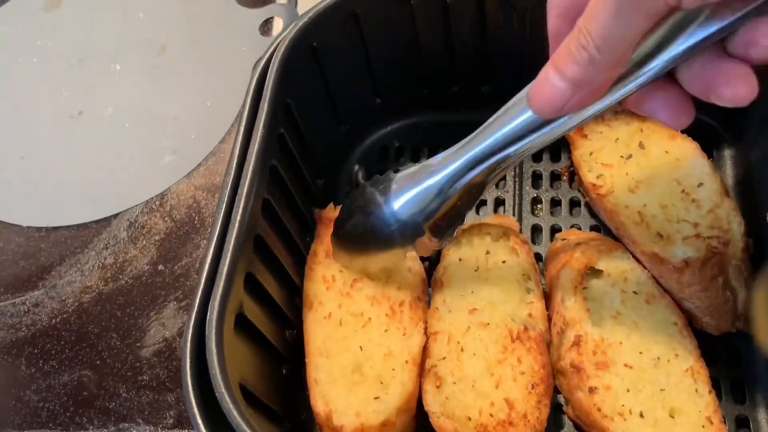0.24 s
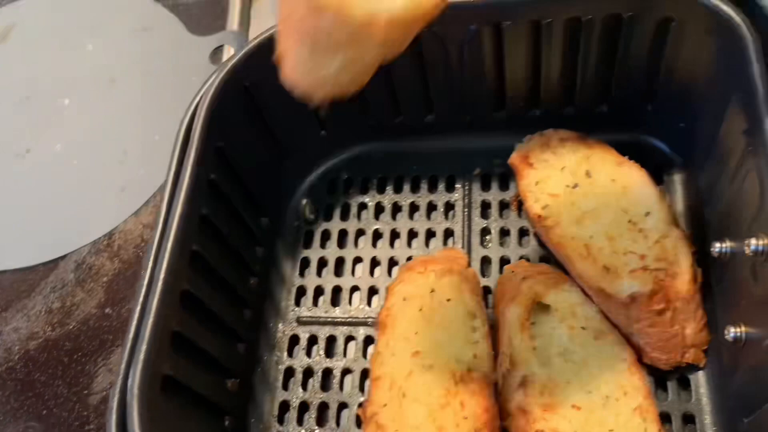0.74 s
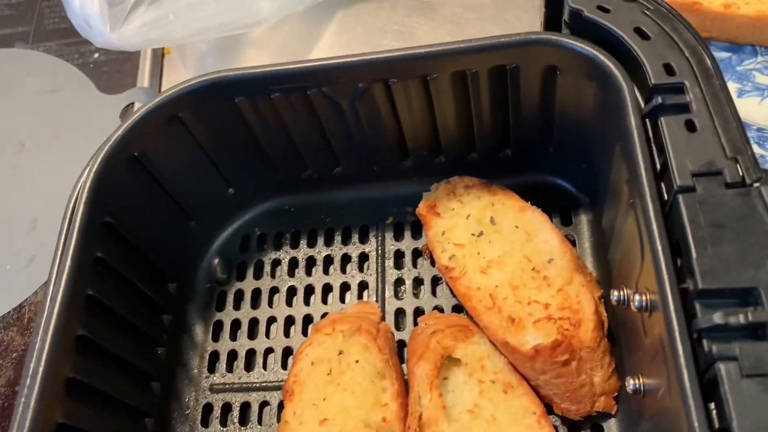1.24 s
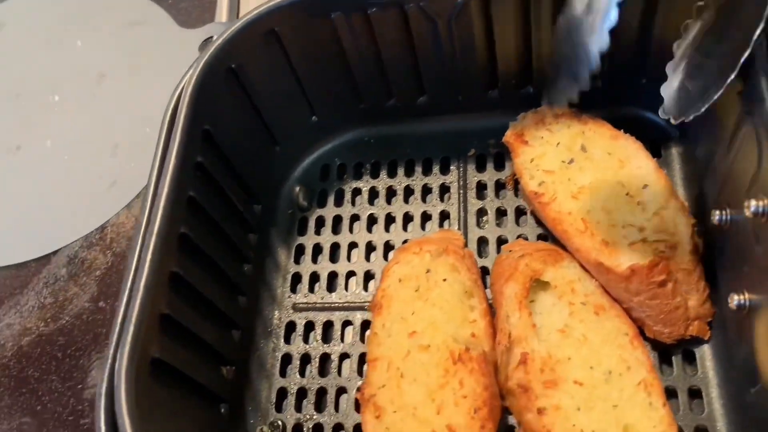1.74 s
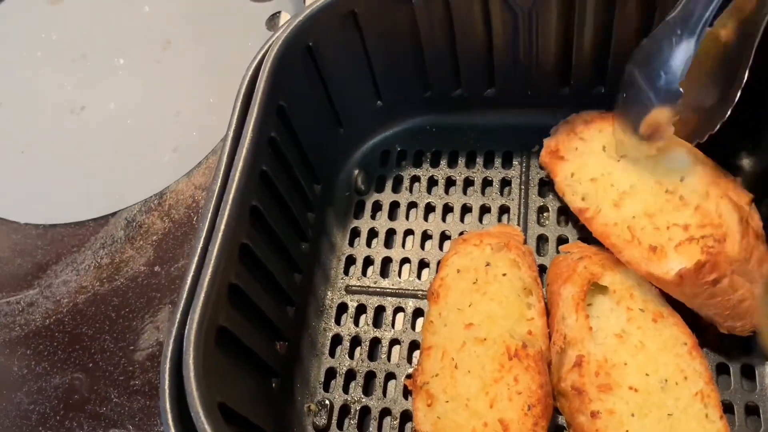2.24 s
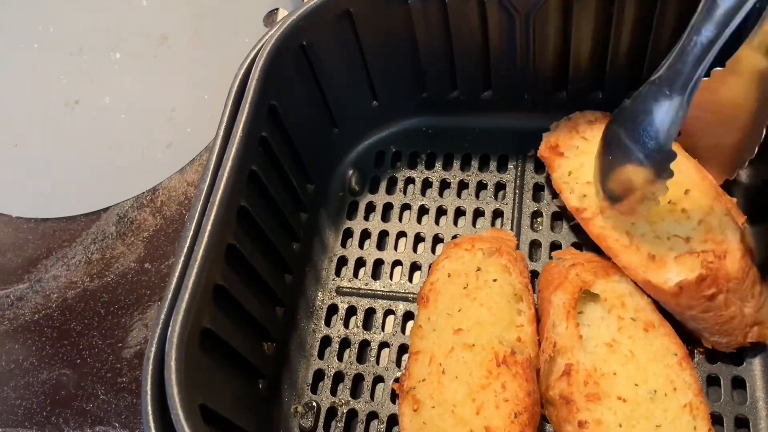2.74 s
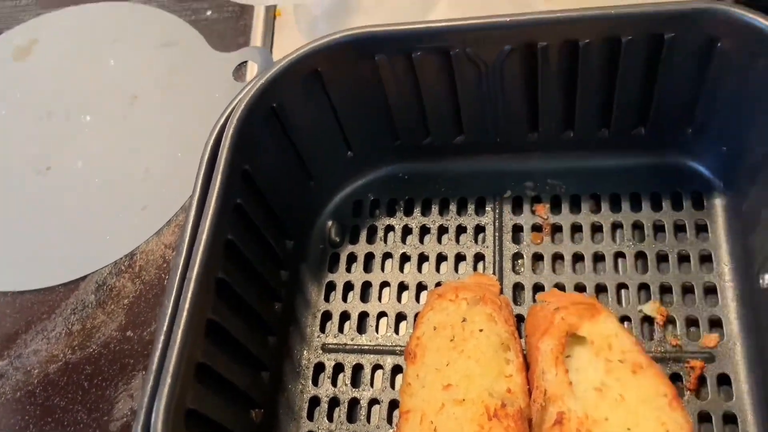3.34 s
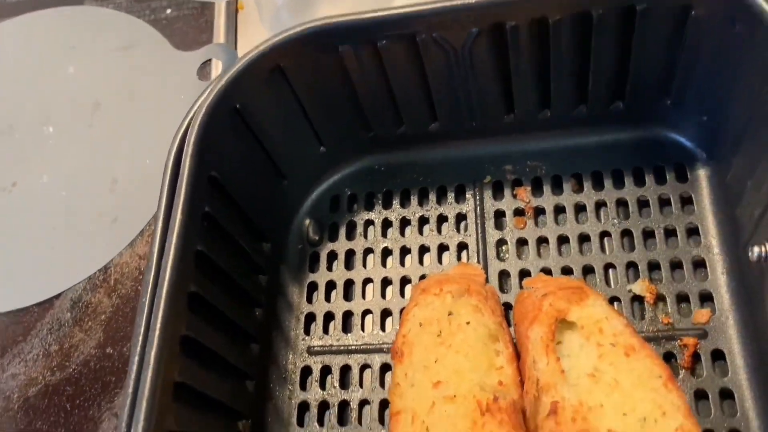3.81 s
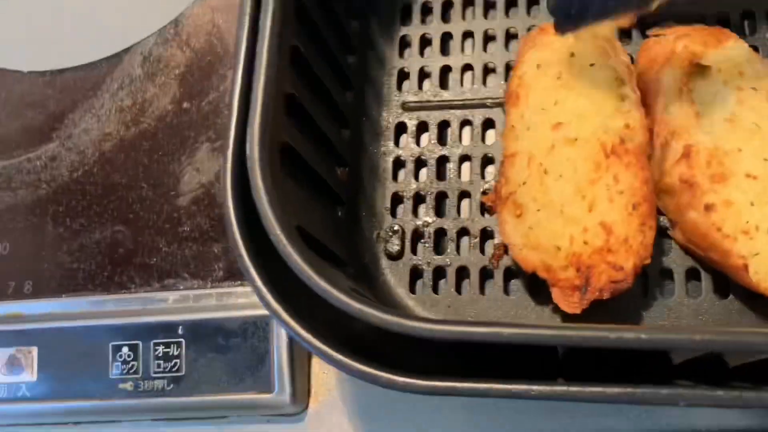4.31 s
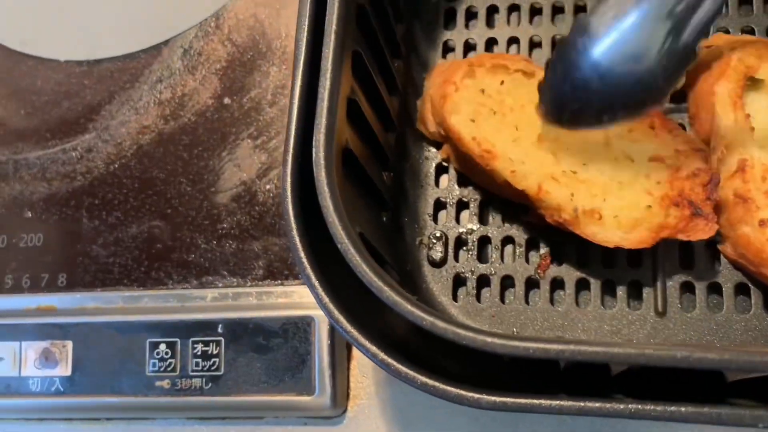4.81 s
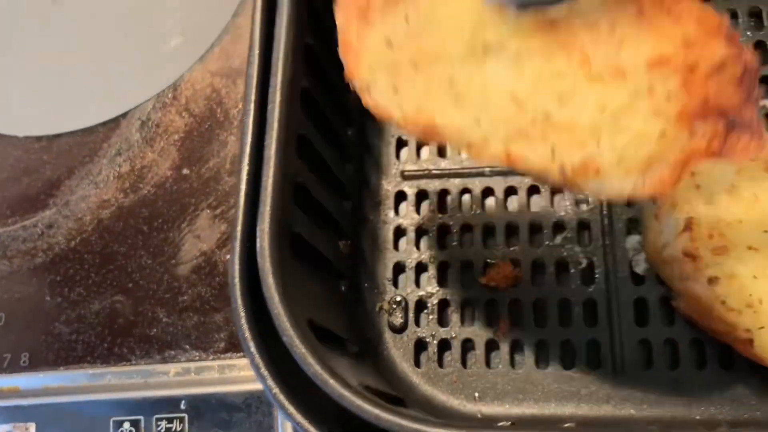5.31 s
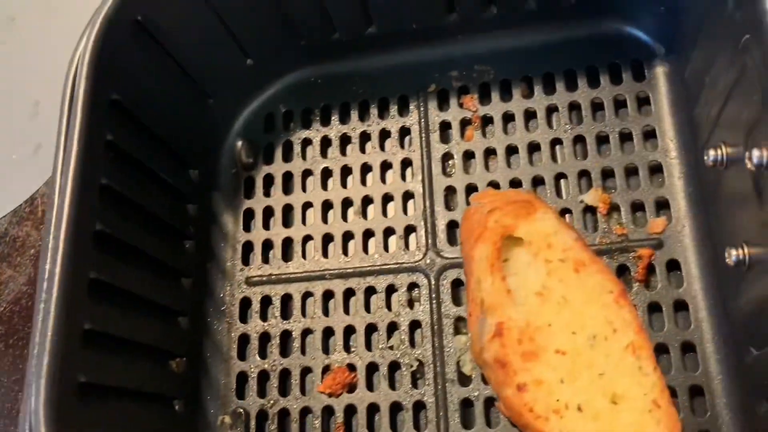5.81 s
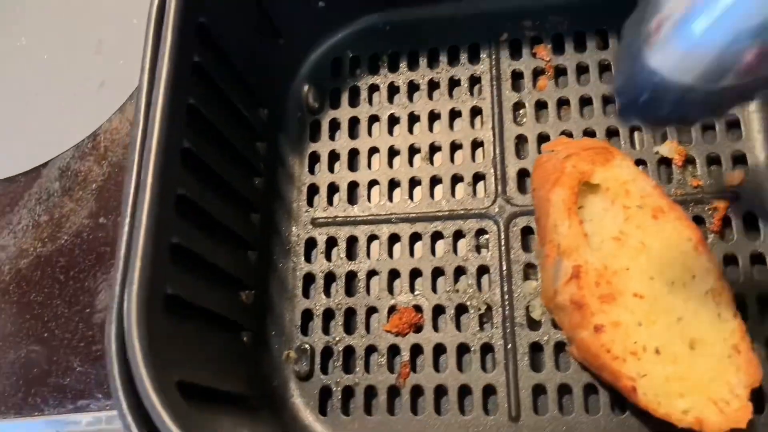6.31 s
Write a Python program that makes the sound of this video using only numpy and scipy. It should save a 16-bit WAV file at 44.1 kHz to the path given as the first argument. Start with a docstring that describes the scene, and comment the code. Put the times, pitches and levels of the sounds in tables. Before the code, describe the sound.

Crusty toast slices rasp and crack under steel tongs, with one bright basket clank, plate clinks and dull thuds in a quiet humming kitchen.

```python
"""Steel tongs knock an air fryer basket as they lift out crisp toast: modal ringing set off by contact force.
Their tips skid on the steel by stick and slip; the crust cracks and rasps in tiny filtered fractures.
Slices drop on a plate, whose damped modes ring while the counter below thuds; low booms swell in places.
An appliance hums in the soft background noise of a small kitchen with a short diffuse tail.
A close pair of microphones is formed from mid and side signals."""
import sys
import numpy as np
from scipy import signal
from scipy.fft import rfft, irfft, next_fast_len
from scipy.io import wavfile
from scipy.ndimage import uniform_filter1d

SR = 44100
rng = np.random.default_rng(int(sys.argv[2]) if len(sys.argv) > 2 else 0)


def store_wav(level_fs):
    """Save 16-bit WAV to argv[1]."""
    pcm = np.round(np.clip(np.atleast_2d(level_fs), -1, 1) * 32767)
    wavfile.write(sys.argv[1], SR, pcm.T.astype(np.int16))


N = 288855
TIME = np.arange(N) / SR  # scene time [s]
RING = np.arange(SR // 2) / SR  # time axis of one blow [s]
LOW_HZ, HIGH_HZ = 320, 2000  # bounds of the middle register

# modes of the basket in its drawer, tongs against it: (frequency [Hz], relative level [dB], t60 [s])
BASKET_MODES = [(131, 1, 0.39), (263, 3.5, 0.19), (350.2, 3, 0.11), (561.3, -5, .08), (680, -4, 0.3),
                (883, -5, 0.044), (1056, -7, 0.11), (1355, -7.5, .1), (1547, -7.5, .11),
                (1898, -11.5, 0.106), (2724, -11, .08), (3000, -6.5, 0.03), (3300, -6, 0.058),
                (4112, 2.5, .07), (4190, -1, .08), (4440, -5.5, .07), (4690, -0.5, 0.087),
                (5250, -5.5, 0.094), (5510, -2.5, .07), (5740, -7.5, 0.15), (6470, -5, 0.1),
                (7800, -11.5, .08), (9600, -12.5, 0.059), (11100, -9.5, .07)]
# spectrum of the crowd of weaker basket modes: (frequency [Hz], relative level [dB])
BASKET_CROWD = [(50, -20.5), (110, 1), (190, -5.5), (290, 4.5), (480, -1), (680, 2), (950, -2.5),
                (1400, -9.5), (2300, -7.5), (3300, -6), (4500, -1.5), (6000, -9), (7800, -14.5),
                (11000, -13.5), (13000, -20.5), (16000, -13.5)]
# colour of crust sounds as picked up, pickup included, with a narrow dip near 12.4 kHz:
# (frequency [Hz], relative level [dB])
CRUST_AS_PICKED_UP = [(130, 3.5), (350, 7.5), (600, 6), (1000, 2.5), (2200, -2), (3600, 2.5), (5400, 4.5),
                      (7600, 1), (9300, 5), (11300, 5), (12400, 0.5), (15500, 5)]


def amp(db):
    """Level in decibels to amplitude ratio."""
    return 10 ** (np.asarray(db) / 20)


def read(points, hz):
    """Interpolation of a spectrum along a logarithmic frequency axis."""
    f, value = np.transpose(points)
    return np.interp(np.log(hz + 1), np.log(f), value)


def evened(x):
    """Normalisation to unit root mean square."""
    return x / np.sqrt(np.mean(x ** 2) + 1e-20)


def fade(t, t60):
    """Exponential decay, falling 60 dB in the time t60."""
    return np.exp(-np.log(1000) * t / np.maximum(t60, 1e-3))


def add(mix, s, sound):
    """Superposition of a sound on the mix from the time s [s]."""
    part = mix[:, max(round(s * SR), 0):][:, :sound.shape[1]]
    part += sound[:, :part.shape[1]]


def colour(x, points):
    """Minimum-phase filtering: the Hilbert transform of the log gain supplies a causal phase."""
    size = next_fast_len(x.shape[-1] + SR // 10)
    hz = abs(np.fft.fftfreq(size, 1 / SR))
    log_gain = np.log(amp(read(points, hz)))
    response = np.exp(np.conj(signal.hilbert(log_gain)))
    return np.fft.ifft(np.fft.fft(x, size) * response).real[..., :x.shape[-1]]


def favour(x, hz, db, spread):
    """A broad resonance; spread is the frequency ratio from its top to its foot."""
    return colour(x, [(hz / spread, 0), (hz, db), (hz * spread, 0)])


def band(x, hz, kind):
    """Fourth-order Butterworth filtering."""
    return signal.sosfilt(signal.butter(4, hz, kind, fs=SR, output="sos"), x)


def registers(x):
    """Band splitting into treble, middle and bass."""
    return band(x, HIGH_HZ, "high"), band(x, [LOW_HZ, HIGH_HZ], "band"), band(x, LOW_HZ, "low")


def peaking(x, db, size=256):
    """Short-time level: each channel's loudest few milliseconds are scaled to db."""
    power = uniform_filter1d(x ** 2, size).max(axis=1, keepdims=True)
    return x * amp(db) / np.sqrt(power + 1e-20)


def wander(hz):
    """Low-passed Gaussian noise: a slow random course of unit RMS."""
    f = np.fft.rfftfreq(N, 1 / SR)
    spectrum = rfft(rng.standard_normal(N)) / (1 + (f / hz) ** 4)
    return evened(irfft(spectrum, N))


def grains(n, per_s, spread_db):
    """A random impulse train: tiny impacts of unequal size and random sign."""
    size = amp(spread_db * np.minimum(rng.exponential(1, n), 4))
    return size * rng.choice([-1, 1], n) * (rng.random(n) < per_s / SR)


def body(modes, crowd, crowd_db, crowd_t60, spot_db, linger_db=-15, linger_t60=.17):
    """Modal superposition, as mid and side: decaying sinusoids over a dense crowd of weak modes."""
    hz, db, t60 = np.transpose(modes)
    # the spot struck weights each mode at random
    weight = amp(db + spot_db * rng.standard_normal((2, len(hz))))
    phase = np.exp(2j * np.pi * rng.random((2, len(hz))))
    vibration = fade(RING, t60[:, None]) * np.exp(2j * np.pi * hz[:, None] * RING)
    ring = (weight * phase @ vibration).imag
    # most of the crowd dies at one rate, a weaker part at another
    dying = fade(RING, crowd_t60) + amp(linger_db) * fade(RING, linger_t60)
    dense = colour(rng.standard_normal((2, len(RING))) * dying, crowd)
    return evened(ring) + amp(crowd_db) * evened(dense)


def walls(x, echo_db, t60):
    """Early reflection: crust sounds bounce between the close walls of the basket."""
    t = RING[:SR // 30]
    echoes = rng.standard_normal((2, len(t))) * fade(t, t60)
    echoes *= amp(echo_db) / np.linalg.norm(echoes, axis=1, keepdims=True)
    echoes[0, 0] += 1  # direct sound in mid
    echoes[1, rng.integers(2, 10)] += 1  # and a few samples later in side
    return signal.oaconvolve(x[None], echoes, axes=1)[:, :len(x)]


def tongs():
    """Impact excitation of modes: the tips graze, hit and chatter; the heavy drawer answers a little later."""
    # blows on the basket: (time [s], clank level [dB], hollow knock level [dB], thump level [dB],
    # pitch of the spot struck [Hz], chatter t60 [s])
    knocks = [(1.6453, -15.5, -26, -29, 875, 0.011), (1.7501, -36.5, -35.5, -47, 1060, 0.075),
              (2.388, -31, -35, -35.5, 660, 0.013), (2.4018, -32.5, -34, -38.5, 916, 0.09),
              (4.3137, -30.5, -33, -31, 860, 0.0077), (4.574, -34, -37, -38.5, 714, 0.025),
              (4.582, -27.5, -30.5, -35, 375, 0.028), (4.629, -32, -41, -35.5, 415, 0.029),
              (4.7628, -34, -37, -37, 694, 0.075), (4.7867, -35.5, -42, -53, 434, 0.044),
              (6.4494, -36, -39, -33, 790, 0.067), (6.5217, -42.5, -42, -54, 680, 0.02)]
    knock_lag_s, thump_lag_s = 0.002113, 0.0044
    graze_db, graze_t60_s = -21, 0.04
    snap_db = -5  # direct sound of the contact, against the ring
    out = np.zeros((2, N))
    lead = SR // 80  # samples of grazing before the hit
    t = RING - RING[lead]
    for s, clank_db, knock_db, thump_db, spot_hz, chatter_t60 in knocks:
        graze = amp(graze_db) * fade(abs(t), graze_t60_s)
        chatter = .5 * fade(abs(t), chatter_t60)
        force = grains(len(t), per_s=1900, spread_db=1.5) * np.where(t < 0, graze, chatter)
        force *= 0.66 / (np.linalg.norm(force) + 1e-9)
        force[lead] += 1  # the hit itself
        ring = body(BASKET_MODES, BASKET_CROWD, crowd_db=6.5, crowd_t60=0.075, spot_db=4.5)
        snap = colour(rng.standard_normal(ring.shape) * fade(RING, 0.019), BASKET_CROWD)
        response = evened(ring) + amp(snap_db) * evened(snap)
        response = favour(response, spot_hz, db=8, spread=1.4)
        blow = signal.fftconvolve(response, force[None], axes=1)[:, :len(t)]
        high, middle, low = registers(blow)
        add(out, s + t[0], peaking(high, clank_db))
        add(out, s + t[0] + knock_lag_s, peaking(middle, knock_db))
        add(out, s + t[0] + thump_lag_s, peaking(low, thump_db))
    return out


def skids():
    """Stick-slip friction: quick slips of the steel tips keep the basket ringing."""
    # slides of the tips over the basket: (start [s], end [s], level [dB])
    slides = [(0.284, 0.497, -51), (1.746, 1.773, -69), (2.399, 2.466, -52), (4.321, 4.347, -44.5),
              (4.564, 4.65, -57), (4.754, 4.826, -42.5), (4.796, 4.88, -61), (6.524, 6.563, -55)]
    squeal_hz = 5200
    out = np.zeros((2, N))
    for start, end, db in slides:
        n = max(round((end - start) * SR), SR // 100)
        slips = grains(n, per_s=3400, spread_db=5.5) * signal.windows.tukey(n, .5)
        ring = body(BASKET_MODES, BASKET_CROWD, crowd_db=1.5, crowd_t60=0.028, spot_db=0.5)
        ring = favour(ring, squeal_hz, db=11, spread=1.23)
        skid = band(signal.fftconvolve(ring, slips[None], axes=1), LOW_HZ, "high")
        add(out, start, peaking(skid, db))
    return out


def plate():
    """Damped modal ringing: a hard edge rings the plate, bread lying on it damps the ring, the counter thuds."""
    # landings: (time [s], clink level [dB], knock level [dB], thump level [dB],
    # contact brightness [Hz], factor on the ring's t60 [ratio])
    drops = [(1.0012, -33.5, -37.5, -39.5, 12000, 0.69), (1.2653, -67, -45.5, -42.5, 3950, 0.45),
             (3.3853, -57, -54.5, -41, 4970, 0.093), (3.4397, -54, -58, -39, 15000, 0.5),
             (3.467, -48, -44, -34.5, 2300, 1.17), (5.88, -60, -38, -36, 12000, 0.32),
             (5.934, -51.5, -54, -39.5, 9000, 0.14), (5.99, -56, -45.5, -38.5, 6000, 0.11),
             (6.0115, -58, -45.5, -61, 8000, 0.57)]
    # plate modes before damping: (frequency [Hz], relative level [dB], t60 [s])
    plate_modes = [(2382, 0, .18), (3975, -4, .21), (5660, -14, .22), (7350, -12, .22), (9205, -8, .22),
                   (11300, -5, .15), (13260, -17, .2)]
    # modes of the counter under the plate: (frequency [Hz], relative level [dB], t60 [s])
    counter_modes = [(131.2, -3, 0.23), (254, -1, 0.083), (341.4, -3, 0.042), (497, -2, 0.094),
                     (568, -8, 0.15), (1063, -12, 0.088)]
    # spectrum of the dull pat of bread: (frequency [Hz], relative level [dB])
    pat_spectrum = [(50, -16.5), (110, 0), (300, -3), (600, -3.5), (1300, -39), (4000, -39), (16000, -43)]
    thump_lag_s = .003
    out = np.zeros((2, N))
    for s, clink_db, knock_db, thump_db, bright_hz, free in drops:
        modes = [(hz, db, t60 * free) for hz, db, t60 in plate_modes]
        ring = body(modes, CRUST_AS_PICKED_UP, crowd_db=-10.5, crowd_t60=0.11, spot_db=2.5)
        # a soft contact favours the lower modes
        ring = colour(ring, [(bright_hz, 0), (2 * bright_hz, -11)])
        thud = body(counter_modes, pat_spectrum, crowd_db=-2, crowd_t60=.07, spot_db=-1.5)
        _, middle, low = registers(thud)
        add(out, s, peaking(ring, clink_db))
        add(out, s, peaking(middle, knock_db))
        add(out, s + thump_lag_s, peaking(low, thump_db))
    return out


def cracks():
    """Brittle fracture: small breaks build up to one snap, then die away as the crust crumbles."""
    # breaks of the crust: (time [s], relative snap level [dB], relative body level [dB],
    # pitch of the flake [Hz])
    breaks = [(0.0114, -42, -45.5, 5300), (0.0383, -31.5, -59, 5430), (0.1185, -46.5, -49.5, 2420),
              (0.194, -41.5, -59, 11200), (0.2577, -38, -56, 8900), (0.2821, -39.5, -52, 9040),
              (0.454, -39.5, -55, 4000), (0.609, -55, -73, 9200), (0.981, -39, -76, 2350),
              (1.0958, -51, -57, 3880), (1.908, -32.5, -53, 9360), (1.93, -31.5, -56, 6200),
              (1.9837, -34, -61, 5600), (2.0297, -31, -39.5, 9800), (2.044, -34, -62, 8900),
              (2.0836, -30.5, -38, 9040), (2.141, -41.5, -47.5, 11040), (2.274, -39.5, -50, 5600),
              (2.351, -47, -49.5, 9000), (2.4015, -28, -35, 11400), (2.5215, -46, -44, 5000),
              (2.5574, -32.5, -41, 5360), (2.7154, -34, -40.5, 9450), (2.7686, -45.5, -45, 11600),
              (2.827, -49, -55, 10500), (2.8597, -48, -59, 8400), (2.993, -62.5, -51, 5970),
              (3.4396, -40, -52, 11900), (4.3054, -35.5, -46, 4450), (4.366, -40.5, -65, 9000),
              (4.532, -36.5, -53, 6120), (5.022, -41.5, -61, 5400), (5.0809, -37.5, -57, 14600),
              (5.881, -42.5, -55, 5760), (5.9368, -44.5, -50, 12100)]
    trim_db = -2  # on snap and body alike
    build_t60_s, crumble_t60_s = 0.025, 0.043
    out = np.zeros((2, N))
    lead = SR // 50  # samples of build-up before the snap
    t = RING[:SR // 5] - RING[lead]
    breaking = np.where(t < 0, .5 * fade(abs(t), build_t60_s), fade(abs(t), crumble_t60_s))
    for s, snap_db, body_db, flake_hz in breaks:
        run = grains(len(t), per_s=2500, spread_db=5.0) * breaking
        run /= np.linalg.norm(run) + 1e-9
        run[lead] += .5  # the snap
        crack = colour(walls(run, echo_db=3.5, t60=0.018), CRUST_AS_PICKED_UP)
        crack = favour(crack, flake_hz, db=11, spread=1.125)
        high, middle, _ = registers(crack)
        add(out, s + t[0], peaking(high, snap_db + trim_db) + peaking(middle, body_db + trim_db))
    return out


def rubbing():
    """Friction of rough surfaces: several spots of crust catch and slip in clumps of tiny fractures."""
    # strokes of toast on steel and plate: (start [s], end [s], relative rasp level [dB],
    # relative drag level [dB])
    strokes = [(0, 0.082, -53.5, -50.5), (0.129, 0.301, -44.5, -50), (0.333, 0.475, -58, -59),
               (0.561, .64, -64.5, -81), (0.939, 1.101, -51, -62.5), (1.153, 1.248, -59, -64.5),
               (1.892, 1.955, -44, -50.5), (1.964, 2.171, -54, -69), (2.217, 2.312, -53.5, -63.5),
               (2.363, 2.47, -55, -53), (2.52, 2.57, -45.5, -50), (2.623, 2.886, -57.5, -61.5),
               (3.381, 3.475, -56, -56.5), (4.28, 4.393, -48.5, -57.5), (4.526, 4.668, -52, -51),
               (4.76, 4.872, -51.5, -54), (4.894, 5.149, -54.5, -68), (5.815, 5.877, -59.5, -67),
               (5.918, 6, -52, -56.5), (6.455, 6.55, -48, -55.5)]
    trim_db = -1  # on rasp and drag alike
    attack_s, release_t60_s = 0.0096, 0.12
    clump_db, spot_count = 6.0, 5
    crackle = np.zeros((2, N))
    for _ in range(spot_count):
        slips = grains(N, per_s=450, spread_db=3) * amp(clump_db * wander(hz=39.2))
        crackle += walls(slips, echo_db=2.5, t60=0.029)
    high, middle, _ = map(evened, registers(colour(crackle, CRUST_AS_PICKED_UP)))
    out = np.zeros((2, N))
    for start, end, rasp_db, drag_db in strokes:
        bite = np.clip((TIME - start) / attack_s, 0, 1)
        pressure = bite * fade(np.maximum(TIME - end, 0), release_t60_s)
        out += pressure * (high * amp(rasp_db + trim_db) + middle * amp(drag_db + trim_db))
    return out


def booms():
    """Resonant filtering of noise: a low boom swells and sinks around the heavier shoves and landings."""
    # swells: (time of the peak [s], relative level [dB], time constant of the rise [s])
    swells = [(.21, -43.5, .1), (1.33, -44, .04), (1.78, -44.5, .03), (1.93, -48, .09), (2.47, -42, .08),
              (3.51, -47.5, .035)]
    # spectrum of the boom: (frequency [Hz], relative level [dB])
    boom_spectrum = [(60, -45), (105, -12.5), (130, 2), (160, -19), (300, -19), (700, -50), (3000, -84.5)]
    trim_db, fall_ratio = -1, 1.1  # the fall is slower than the rise by this ratio
    level = np.zeros(N)
    for s, db, rise in swells:
        distance = np.maximum(s - TIME, (TIME - s) / fall_ratio)
        level += amp(db) * np.exp(-distance / rise)
    noise = colour(rng.standard_normal((2, N)), boom_spectrum)
    return amp(trim_db) * level * evened(noise)


def kitchen():
    """Frequency and amplitude modulation: wavering hum lines over soft, dark background noise."""
    # background noise of the still kitchen as picked up, pickup included:
    # (frequency [Hz], relative level [dB])
    background_as_picked_up = [(25, -23.5), (52, -19.5), (75, -12.5), (100, -8), (135, -6.5), (190, -18),
                               (275, -10), (400, -24), (520, -20), (900, -28), (2000, -36), (5000, -47.5),
                               (10000, -48.5), (12400, -51), (14500, -45.5), (16000, -49.5)]
    # appliance hum: (mean frequency [Hz], mean level [dB], RMS frequency waver [Hz])
    hum_lines = [(70.5, -55, 0.44), (140.3, -59.5, 2), (276, -65, 3.2), (508, -78.5, 6), (523, -78, 6)]
    background_db = -65  # of the middle register in mid
    flutter = 0.2  # RMS amplitude modulation
    background = colour(rng.standard_normal((2, N)), background_as_picked_up)
    background *= amp(background_db) / registers(background)[1][0].std()
    hum = np.zeros(N)
    for hz, db, waver in hum_lines:
        loudness = amp(db) * (1 + flutter * wander(hz=5))
        phase = 2 * np.pi * np.cumsum(hz + waver * wander(hz=6.5)) / SR
        hum += loudness * np.sqrt(2) * np.sin(phase)
    return background + hum * np.array([[1], [-.4]])  # the hum leans to one side


def room(x):
    """Diffuse reverberation: convolution with decaying noise whose treble dies first."""
    # reverberation time: (frequency [Hz], t60 [s])
    reverberation = [(120, 0.31), (500, 0.33), (1500, 0.28), (4000, .25), (10000, 0.23), (16000, 0.15)]
    taps = rng.standard_normal((2, len(RING))) * (RING > .006)
    hz, t, z = signal.stft(taps, SR, nperseg=256)
    decay = fade(t, read(reverberation, hz)[:, None])
    tail = signal.istft(z * decay, SR, nperseg=256)[1]
    return signal.fftconvolve(x, tail / np.linalg.norm(tail[0]), axes=1)[:, :N]


def scene():
    """Mid-side stereophony: the close microphones hear the bass more alike than the treble."""
    # gain of the side signal: (frequency [Hz], gain [dB])
    side_gain = [(60, -14.5), (300, -10), (700, -3), (1400, 0), (3000, -0.5), (5500, -1), (9500, 0),
                 (14000, -1.5)]
    steel = tongs() + skids()
    china = plate()
    crust = cracks() + rubbing() + booms()
    to_room = amp(-15.5) * steel + amp(-10.0) * china + amp(-9.5) * crust
    mid, side = steel + china + crust + room(to_room) + kitchen()
    side = colour(side, side_gain)
    return np.array([mid + side, mid - side])


def record(dry):
    """Band limitation: a linear-phase low-pass filter ends the recorder's treble."""
    edge_hz = 15900
    lowpass = signal.firwin(255, edge_hz, window=("kaiser", 8), fs=SR)
    return signal.oaconvolve(dry, lowpass[None], "same", axes=1)


dry = scene()
out = record(dry)
store_wav(out)
```